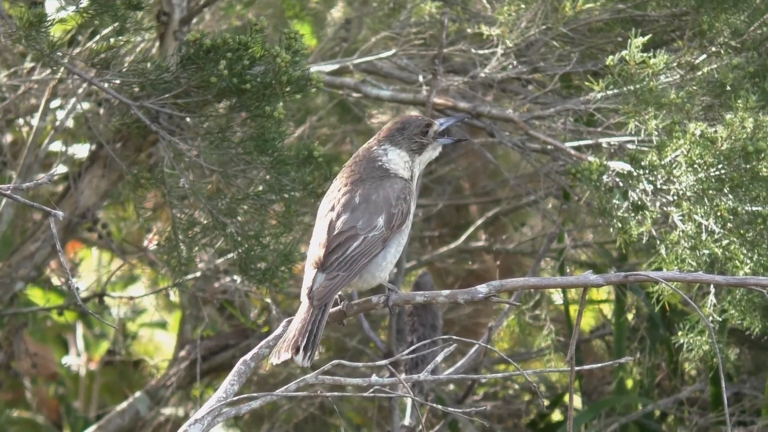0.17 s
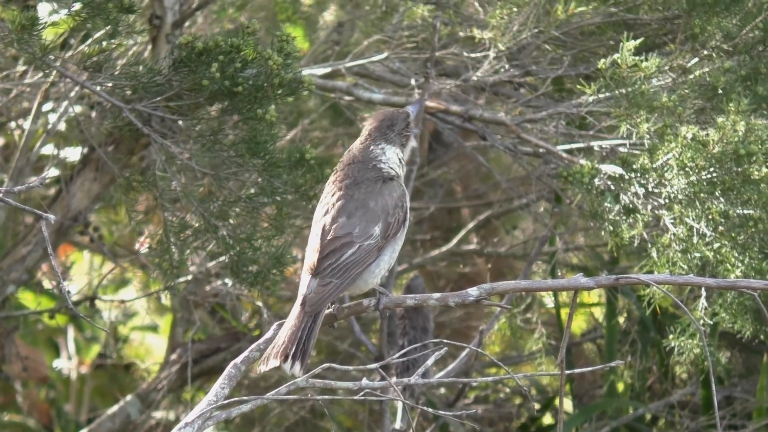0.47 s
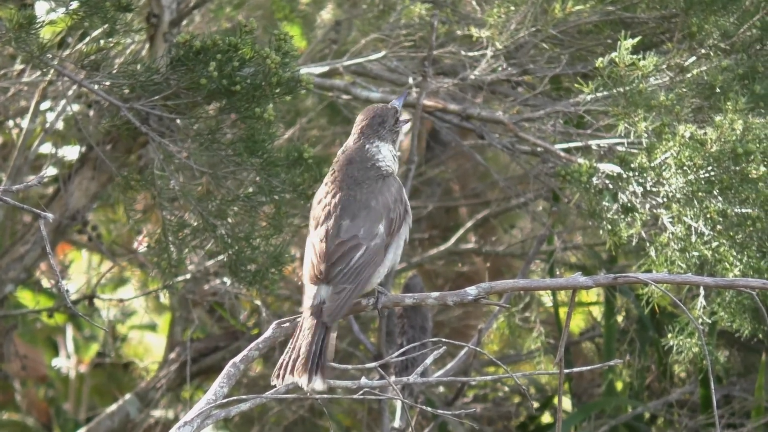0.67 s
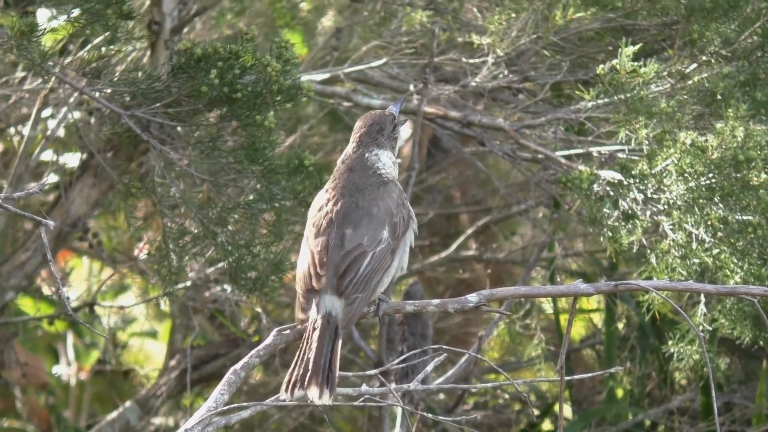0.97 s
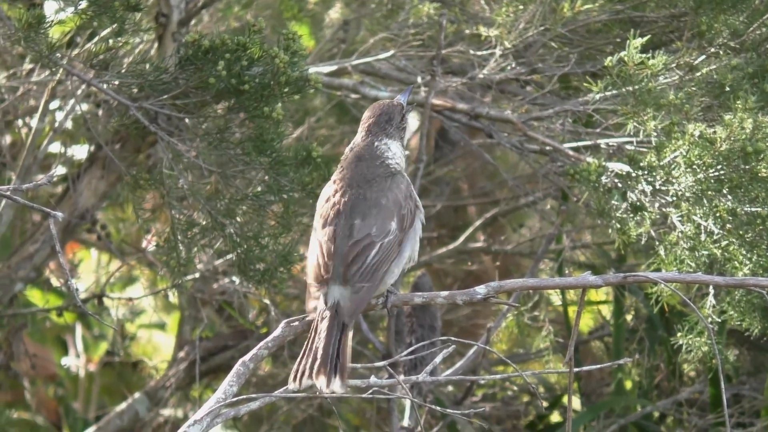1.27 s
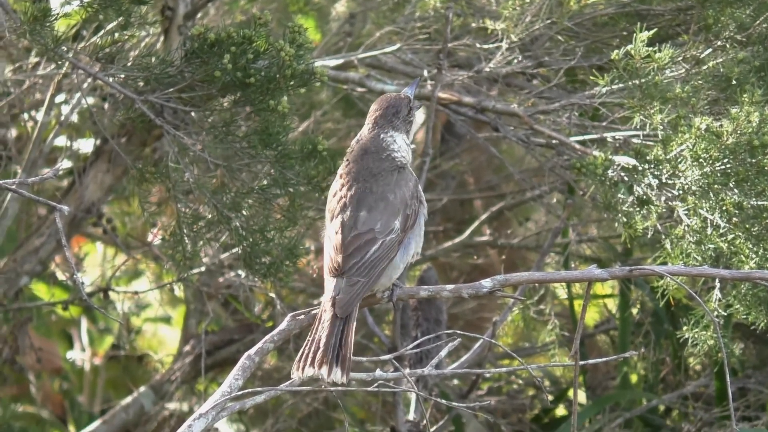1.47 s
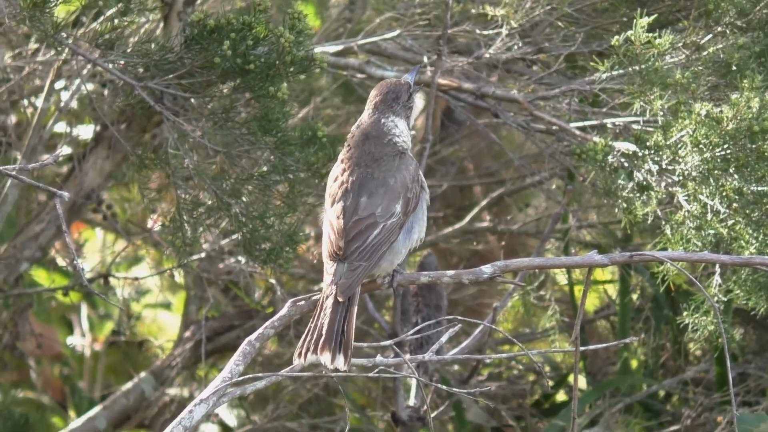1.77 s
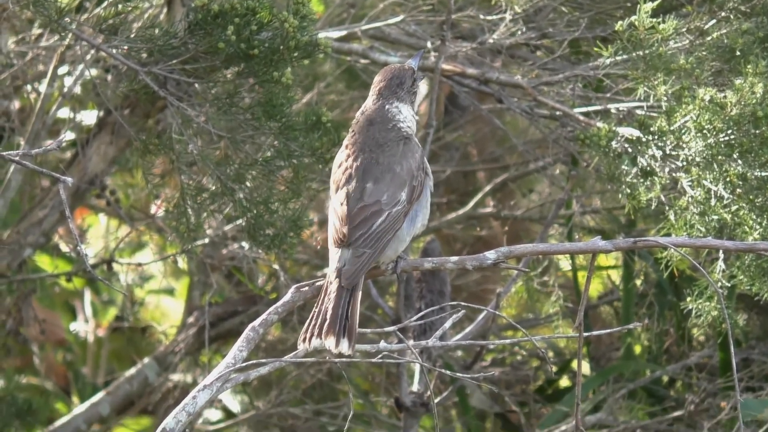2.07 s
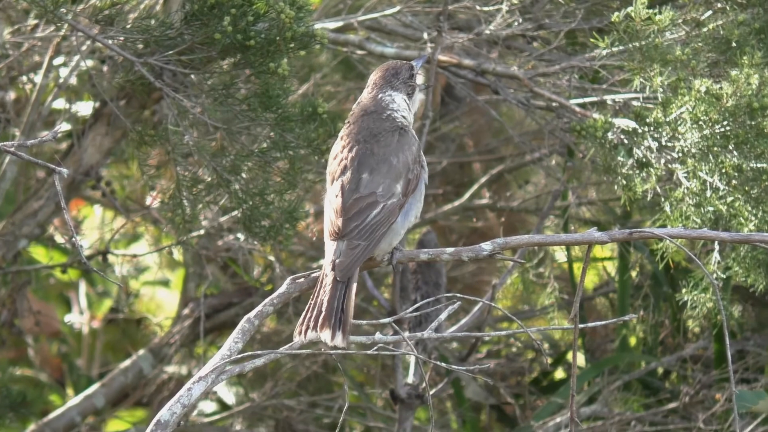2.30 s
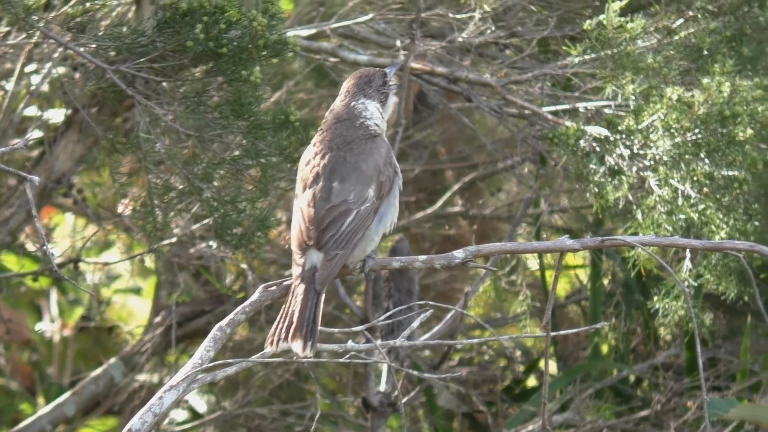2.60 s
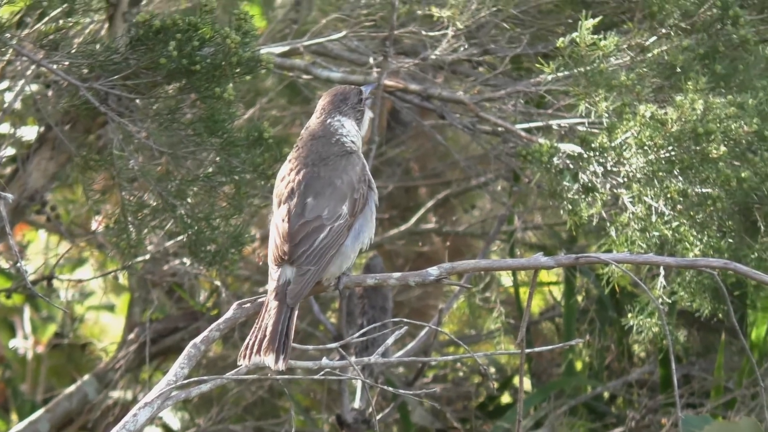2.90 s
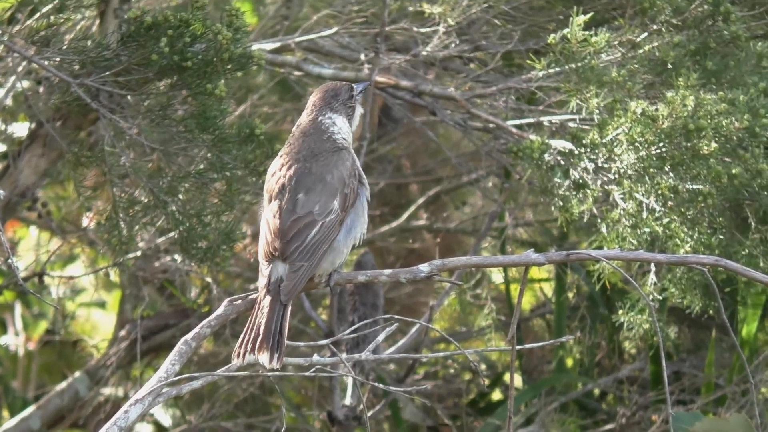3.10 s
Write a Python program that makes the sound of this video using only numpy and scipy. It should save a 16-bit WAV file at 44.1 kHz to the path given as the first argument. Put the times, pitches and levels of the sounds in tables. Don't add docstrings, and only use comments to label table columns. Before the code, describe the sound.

Close bird outdoors: two rasping calls, three scooped whistles, four more harsh calls with one dry bill snap, three whistles, a last rasp, then thin distant chirps; short woodland echo, soft engine drone, camera microphone.

```python
import sys
import numpy as np
from scipy import signal
from scipy.fft import rfft, irfft
from scipy.io import wavfile
from scipy.ndimage import uniform_filter1d, map_coordinates

SR = 44100
rng = np.random.default_rng(int(sys.argv[2]) if len(sys.argv) > 2 else 0)


def pcm_store(signal):
    levels = np.round(np.clip(np.atleast_2d(signal), -1, 1) * 32767)
    wavfile.write(sys.argv[1], SR, levels.astype(np.int16).T)


def level_to_linear(level):
    exponent = np.asarray(level, float) / 20
    return 10 ** exponent


N = 143325


def unit(x):
    return x / np.sqrt(np.mean(x ** 2) + 1e-20)


def along(points, hz):
    f, v = np.transpose(points)
    return np.interp(np.log(hz + 1), np.log(f + 1), v)


def wobble(rate_hz, size):
    knots = rng.standard_normal(int(size * rate_hz / SR) + 4)
    return map_coordinates(knots, [np.arange(size) * rate_hz / SR])


def phase(hz):
    return 2 * np.pi * np.cumsum(hz) / SR


def add(track, start_s, x, fade_s=.004):
    t = np.arange(len(x)) / SR
    fade = np.clip(np.minimum(t, t[::-1]) / fade_s, 0, 1)
    part = track[round(start_s * SR):][:len(x)]
    part += (x * fade)[:len(part)]


def peak(hz, centre_hz, width_hz):
    return (hz * width_hz / np.hypot(centre_hz ** 2 - hz * hz, hz * width_hz)) ** 2.575


def hiss(size, centre_hz, width_hz):
    gain = peak(np.fft.rfftfreq(size, 1 / SR), centre_hz, width_hz)
    noise = irfft(rfft(rng.standard_normal(size)) * gain, size)
    return unit(noise) * level_to_linear(1.87 * wobble(45.3, size))


def air():
    # f/Hz, density/dB
    spectrum = [(20, -34), (40, -14.5), (70, -6.5), (148, -5.5), (450, -12), (700, -19), (2400, -23.5),
                (5000, -35.5), (15500, -36)]
    # f/Hz, correlation
    alike = [(30, 0.47), (120, 0.87), (300, 0.65), (950, 0.67), (3770, 0.52), (15000, .1)]
    hz, _, z = signal.stft(rng.standard_normal((2, N)), SR, nperseg=2048)
    patches_db = 2.05 * unit(uniform_filter1d(rng.standard_normal(z.shape[1:]), 9, 1))
    z = z * level_to_linear(along(spectrum, hz)[:, None] + patches_db)
    angle = np.arccos(np.clip(along(alike, hz), -1, 1))[:, None] / 2
    pair = np.array([np.cos(angle) * z[0] + side * np.sin(angle) * z[1] for side in (1, -1)])
    return level_to_linear(-49) * unit(signal.istft(pair, nperseg=2048)[1][:, :N])


def engine_drone():
    # t/s, f/Hz, level/dB
    course = [(0.0, 143, -48), (0.38, 147.1, -43.5), (0.46, 122, -48.5), (1.56, 139.5, -49.5),
              (2.05, 117.1, -58), (2.24, 155.6, -61), (2.31, 119.4, -71), (2.9, 152.5, -46),
              (3.25, 158, -47)]
    t = np.arange(N) / SR
    s, pitch_hz, db = np.transpose(course)
    blur_hz = 5 * wobble(24.86, N)
    drone = np.sin(phase(np.interp(t, s, pitch_hz) + blur_hz))
    drone = drone * level_to_linear(np.interp(t, s, db) + 2.2 * wobble(40, N))
    return drone * level_to_linear([[-0.7], [0.7]])


def trees(x):
    # f/Hz, t60/s
    decay = [(800, 1), (1600, 0.61), (2500, 0.58), (5000, 0.5), (12000, 1)]
    # f/Hz, level/dB
    colour = [(1600, 2.5), (2500, 2), (5000, 8.5), (10000, 2)]
    hz, t, z = signal.stft(rng.standard_normal((2, SR)), SR, nperseg=256)
    level_db = along(colour, hz)[:, None] - 60 * t / along(decay, hz)[:, None]
    tail = signal.istft(z * level_to_linear(level_db), SR, nperseg=256)[1]
    tail = tail + 0.32 * tail.sum(0)
    tail = tail / np.linalg.norm(tail[0])
    late = np.pad(x, (300, 0))[None]
    return signal.fftconvolve(late, tail, axes=1)[:, :N]


def answers():
    # t/s, level/dB
    calls = [
        (2.542, -51.5),
        (2.681, -41),
        (2.81, -45),
        (2.935, -41.5),
        (3.065, -40),
        (3.203, -43),
    ]
    length_s, low_hz, high_hz, bend = 0.047, 2250, 4220, 2.1
    out = np.zeros(N)
    u = np.linspace(0, 1, round(length_s * SR))
    tone = np.sin(phase(low_hz + (high_hz - low_hz) * u ** bend))
    swell = np.sin(np.pi * u) ** 0.69
    for s, db in calls:
        add(out, s, level_to_linear(db + 1) * swell * tone)
    return out


def bill_snap():
    start_s, level_db = 1.612, -33
    out, t = np.zeros(N), np.arange(200) / SR
    click = uniform_filter1d(rng.standard_normal(len(t)), size=4)
    add(out, start_s, level_to_linear(level_db - 60 * t / .004) * click, fade_s=.0001)
    return out


def whistles():
    # t/s, dwell on low note/s, climb time/s, end/s, top f/Hz
    notes_table = [
        (.686, 0.0091, 0.0049, 0.77, 2505),
        (.8, 0.0089, 0.0065, 0.87, 2490),
        (0.948, 0.017, 0.0056, 1.036, 2497),
        (2.366, 0.0086, 0.0045, 2.447, 2432),
        (2.483, 0.0099, 0.0091, 2.548, 2468),
        (2.638, 0.016, 0.0084, 2.712, 2435),
    ]
    # low note/dB, top note/dB, octave over top note/dB
    levels = [(-18, -30, -1), (-17.5, -31, -1), (-18, -29.5, -4.5), (-20.5, -30, 0.5), (-20, -29, -3),
              (-18.5, -29.5, -3)]
    overtones_db = [-14, -20, -21, -47]
    rasp = [.35, .4, .55, .6, .6]
    scoop_hz, low_hz, scoop_s, scoop_db = 1003, 1646, 0.00422, -14
    creep, creep_s = 0.0291, 0.0312
    out = np.zeros(N)
    for (s, dwell_s, climb_s, end_s, top_hz), (low_db, top_db, octave_db) in zip(notes_table, levels):
        t = np.arange(0, end_s - s, 1 / SR)
        up = 1 - np.exp(-np.clip(t - dwell_s, 0, None) / climb_s)
        scoop = np.exp(-t / scoop_s)
        hold_hz = top_hz * (1 - creep * np.exp(-t / creep_s))
        hz = low_hz - (low_hz - scoop_hz) * scoop + (hold_hz - low_hz) * up
        turn = phase(hz * (1 + 0.01 * wobble(161, len(t))))
        boom = level_to_linear(low_db) / (1 + ((hz - 1590) / 170) ** 2)
        boom = boom + level_to_linear(low_db + scoop_db) * scoop
        tone = (boom + level_to_linear(top_db - 87 * t) * up ** 3) * np.sin(turn)
        for k, db in enumerate([octave_db] + overtones_db):
            flutter = 1 - rasp[k] + rasp[k] * wobble(350 + 150 * k, len(t))
            partial_db = top_db + db - 11.8 * (1 - up ** 3) + 1.8 * wobble(62.8, len(t))
            tone += level_to_linear(partial_db) * flutter * np.sin((k + 2) * turn)
        tone += level_to_linear(top_db - 15.5 - 150 * t) * up * hiss(len(t), 9150, 3500)
        add(out, s, np.sqrt(2) * tone * level_to_linear(0.35 * wobble(69.6, len(t))), fade_s=0.01)
    return out


def throat(hz, mid_db, upper_db, pitch_hz):
    # f/Hz, width/Hz, level/dB
    bands = [(1584, 413, 12), (2780, 260, -9.5), (3090, 390, -42.5)]
    low = np.clip(2 * pitch_hz / 1380, 0, 1)
    high = np.clip(pitch_hz / 859, 0, 1)
    gain = 0
    for (centre_hz, width_hz, db), lift_db, sink in zip(bands, [0, mid_db, upper_db], [low, high, high]):
        gain = gain + level_to_linear(db + lift_db) * peak(hz, centre_hz * sink, width_hz)
    return gain


def voice(hz, depth=0, mid_db=4, upper_db=8, top_db=-8):
    # f/Hz, width/Hz, level under the voice/dB
    breath_bands = [(1786, 740, -18.5), (6710, 1420, -30.5), (9460, 2500, -33.5), (5030, 1460, -38.5)]
    cycles = 5
    slant = 0.3474
    flip_hz, first_db, flip_first_db, flick_db = 900, -27, 14, -15
    size = len(hz)
    turn = phase(hz * (1 + 0.006 * wobble(300, size)))
    slow = phase(hz / cycles * (1 + 0.047 * wobble(60.3, size)))
    steady = 1 / (1 + (hz / flip_hz) ** 12)
    flick = (1 - steady) * (depth > 0)
    shake = np.clip(depth * level_to_linear(2.9 * wobble(58.6, size)), 0, .9) * steady
    out, power = np.zeros(size), np.zeros(size)
    for k in range(1, 6):
        for j in range(-2, 4):
            gain = throat(hz * (k + j / cycles), mid_db, upper_db, hz)
            gain = gain + level_to_linear(flick_db - 2.04 * k) * flick
            if k == 1:
                gain = np.maximum(gain, level_to_linear(first_db + flip_first_db * (1 - steady) - 10 * abs(j)))
            gain = gain * level_to_linear(-4.5 * (k > 2) * (j < 1))
            gain = gain * shake ** abs(j) * .25 ** max(-j - 1, 0)
            tone = np.sin(k * turn + j * slow + slant * (cycles * (k - 2) + j) ** 2)
            out += gain * level_to_linear(1.92 * wobble(89, size)) * tone
            power += gain ** 2 / 2
    late = np.clip(3 * np.linspace(0, 1, size) - 1.7, 0, 1)
    lifts_db = [0, 0.12 * top_db, top_db + 9 * late, 0]
    breath = np.zeros(size)
    for (centre_hz, width_hz, db), lift_db in zip(breath_bands, lifts_db):
        breath += level_to_linear(db + lift_db) * hiss(size, centre_hz, width_hz)
    return out / np.sqrt(power) + breath * (1 + 0.15 * np.cos(slow)) * (1 + 2 * flick)


def bill_ring(size, first_hz, last_hz, width_hz, early_db, late_db, start, takes):
    u = np.linspace(0, 1, size)
    turn = phase(first_hz + (last_hz - first_hz) * u)
    noise = wobble(width_hz, size) * np.sin(turn) + wobble(width_hz, size) * np.cos(turn)
    return unit(noise) * level_to_linear(early_db + (late_db - early_db) * np.clip((u - start) / takes, 0, 1))


def harsh_calls():
    # t/s, f/Hz, level/dB
    early_calls = [
        [(.14, 546.5, -56), (.16, 563.3, -41), (.225, 668, -36), (.3, 769, -28), (.376, 845.6, -25.5),
         (.385, 850, -26), (.39, 1070, -38), (.4, 1290, -41)],
        [(.474, 721, -32), (.49, 759, -40.5), (.498, 785, -27), (.54, 832, -26), (.57, 831, -30),
         (.59, 1061, -38), (.612, 1190, -44)],
        [(1.11, 689, -36.5), (1.13, 777, -25), (1.2, 758, -24), (1.262, 811, -22.5), (1.274, 870, -34.5),
         (1.292, 1274, -55)],
        [(1.398, 678.7, -32.5), (1.425, 780, -26), (1.55, 761, -25.5), (1.602, 822.6, -23), (1.625, 936, -32.5),
         (1.648, 1390, -51.5)],
    ]
    late_calls = [
        [(1.755, 698.7, -38), (1.8, 720, -27), (1.83, 685, -31.5), (1.9, 697.7, -29), (1.95, 742.4, -28),
         (1.972, 760, -23), (1.988, 766.5, -28), (1.994, 796, -20), (2.032, 1220, -56.5)],
        [(2.12, 739, -35), (2.15, 775.3, -26.5), (2.2, 794.4, -24.5), (2.24, 813, -25.5), (2.256, 873, -27),
         (2.268, 1298, -39.5), (2.283, 1400, -28)],
        [(2.808, 726.6, -38.5), (2.83, 772, -27), (2.9, 763.2, -26), (2.94, 785.3, -24.5), (2.965, 896, -31),
         (2.986, 1342, -51)],
    ]
    # rattle depth/0-1, second throat band/dB, band above/dB, top band/dB
    rattle = [(.55, 7, 38, -3), (0.35, 14.5, 25, 6), (0.31, 1.5, 2, -10), (0.44, -0.5, 2, -8),
              (0.34, -15, -2, -8.5), (0.46, 7.5, 9, -7), (0.41, -2, 5, -23)]
    # first f/Hz, last f/Hz, width/Hz, early level/dB, late level/dB
    bills = [(4620, 5000, 680, -36, -26), (4630, 4780, 500, -26, -15), (4600, 4750, 800, -38.5, -37),
             (4540, 4950, 530, -19, -36), (4620, 4720, 350, -20.5, -46), (4930, 4600, 770, -36, -35),
             (4700, 4750, 800, -30, -39)]
    bill_turns = [(0.42, 0.62), (0.49, .3), (.5, .4), (0.17, 0.48), (0.63, .05), (.4, .4), (0.41, .4)]
    # t/s, length/s, first f/Hz, last f/Hz, level/dB
    grace = [
        (.672, .016, 900, 930, -34),
        (.924, .022, 880, 920, -27),
        (2.612, .024, 950, 880, -29),
        (.596, .018, 1560, 1760, -19),
        (2.274, .019, 1600, 1580, -19),
    ]
    out = np.zeros(N)
    for rows, colour, bill, turns in zip(early_calls + late_calls, rattle, bills, bill_turns):
        s, hz, db = np.transpose(rows)
        t = np.arange(s[0], s[-1], 1 / SR)
        call = voice(np.interp(t, s, hz), *colour) + bill_ring(len(t), *bill, *turns)
        add(out, s[0], level_to_linear(np.interp(t, s, db)) * call)
    for s, length_s, first_hz, last_hz, db in grace:
        u = np.linspace(0, 1, round(length_s * SR))
        swell = np.sin(np.pi * u) ** 0.8
        add(out, s, level_to_linear(db) * swell * voice(first_hz + (last_hz - first_hz) * u))
    return out


def wall_echo(bird):
    # delay/s, level/dB
    echoes = [
        (.035, -12.5),
        (0.013, -14.5),
        (0.018, -31),
    ]
    sides = []
    for lag in (0, 5):
        sides.append(sum(level_to_linear(db) * np.roll(bird, round(s * SR) + lag * k)
                         for k, (s, db) in enumerate(echoes)))
    return np.array(sides)


def scene():
    bird = harsh_calls() + whistles() + bill_snap()
    far = answers()
    direct = (bird + far) * level_to_linear([[.2], [-.2]])
    tail = trees(level_to_linear(-8) * bird + far)
    return direct + wall_echo(bird) + tail + air() + engine_drone()


def band_limit(x):
    return signal.sosfilt(signal.butter(12, 15690, fs=SR, output="sos"), x)


def record(dry):
    kept = np.fft.rfftfreq(N, 1 / SR) < 15700
    mix = irfft(rfft(dry) * kept, N)
    return band_limit(mix)


dry = scene()
out = record(dry)
pcm_store(out)
```